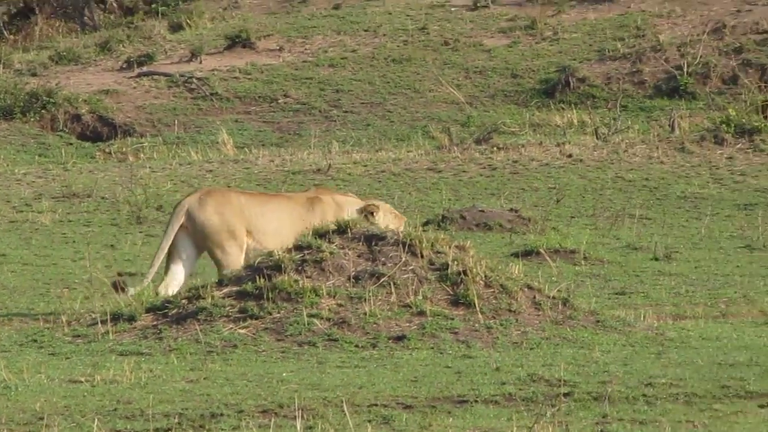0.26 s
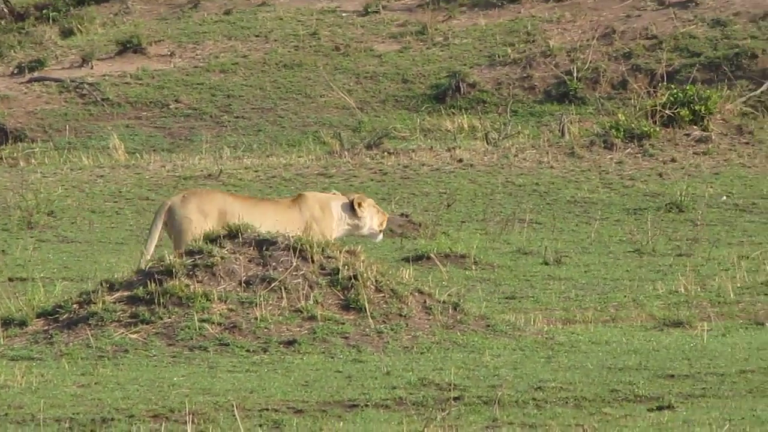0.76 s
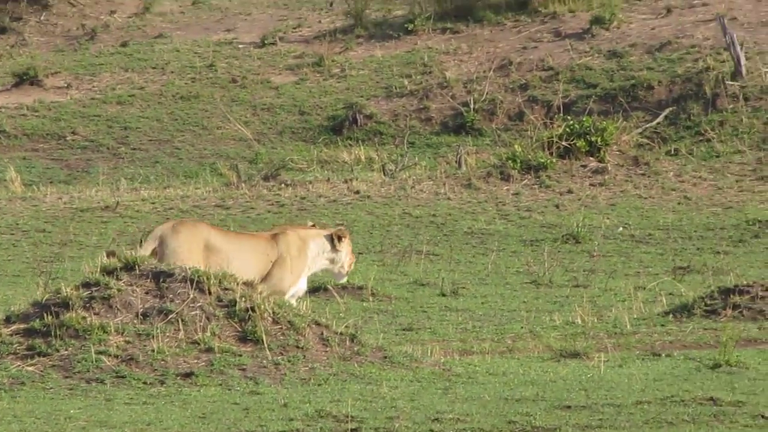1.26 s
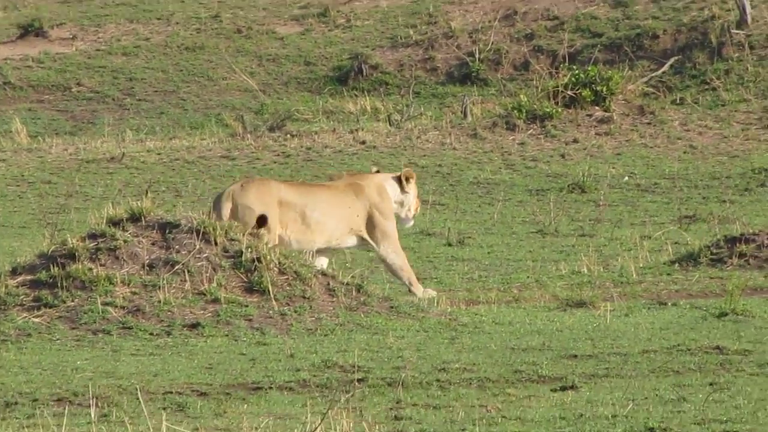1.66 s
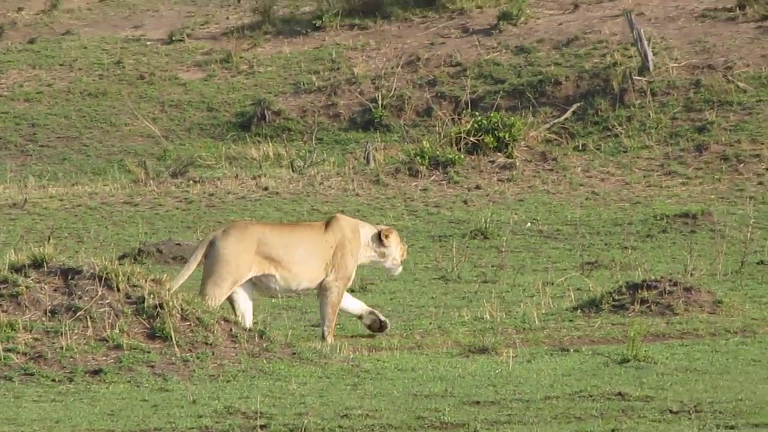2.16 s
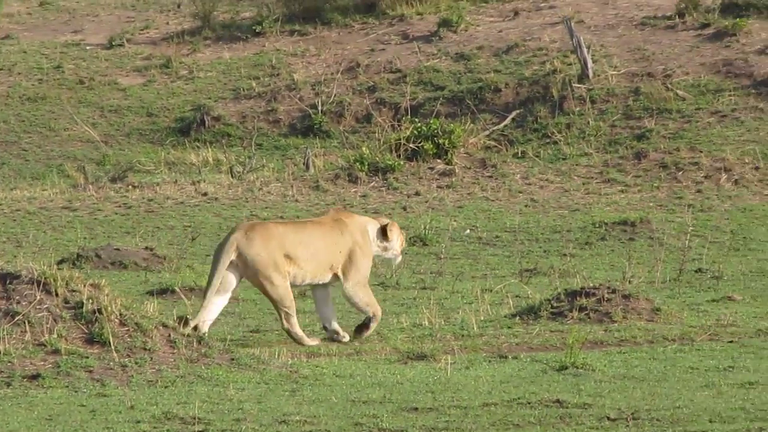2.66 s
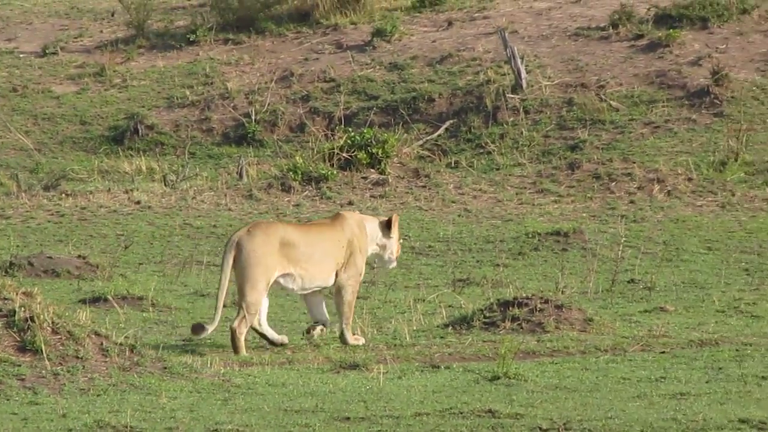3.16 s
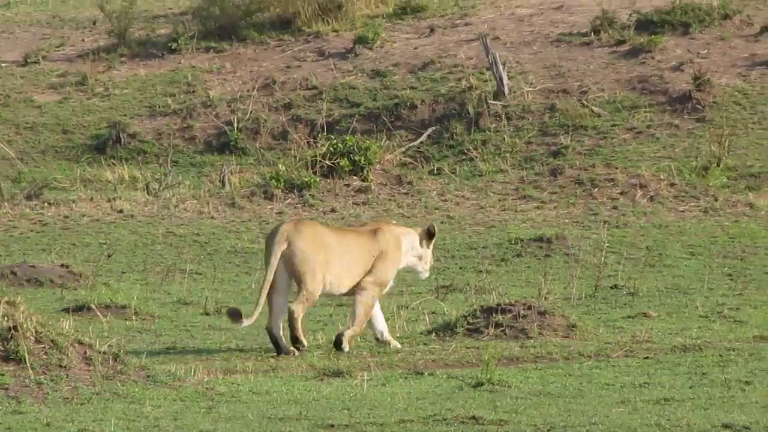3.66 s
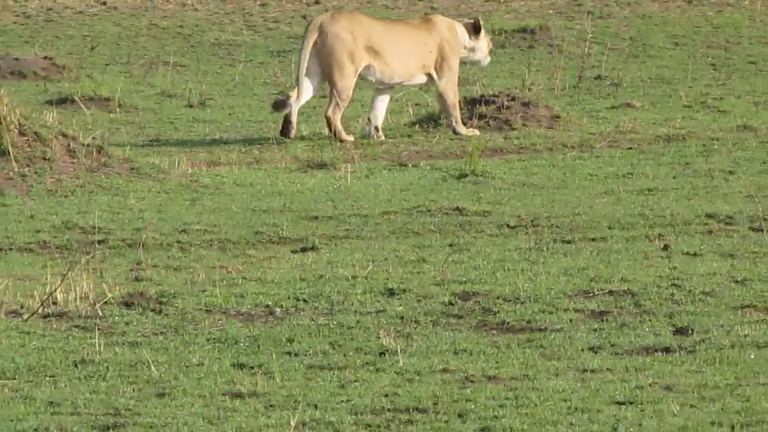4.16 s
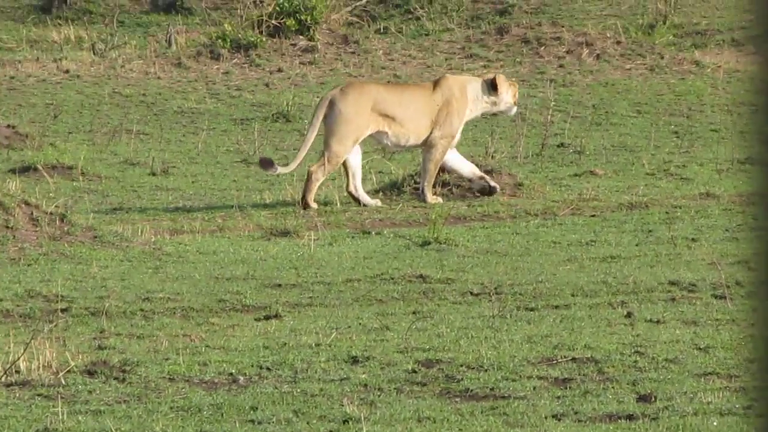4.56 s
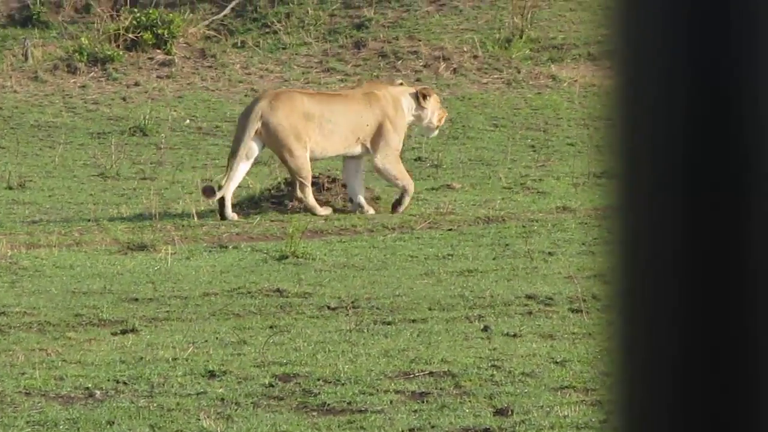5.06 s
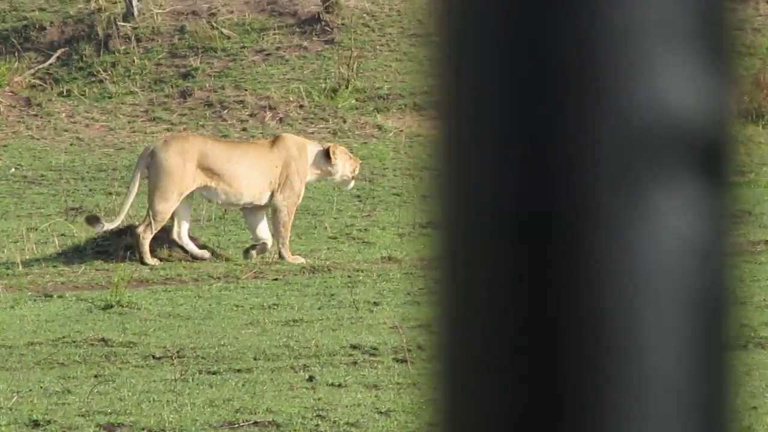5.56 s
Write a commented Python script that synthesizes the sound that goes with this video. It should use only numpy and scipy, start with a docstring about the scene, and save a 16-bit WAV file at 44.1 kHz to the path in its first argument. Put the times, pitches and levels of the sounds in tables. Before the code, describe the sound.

On open grassland a lioness gives three short, low, moaning roars about two seconds apart, each rising and falling and closing in a breathy rasp. A bird slightly to the left answers each with a rising whine and a squeal, while a smaller bird pips far away. A camera mount creaks and clicks now and then. Wind rumbles and thumps on the microphone throughout.

```python
"""A low moan rises out of the wind: a lioness gives three roars on open grassland. Each is one arch of
pitch, in which her vocal folds sound a low tone, a high tone takes over near the top, and turbulent
breath closes with a rasp. A bird to one side whines and squeals, and a smaller one pips far away.
A turning mount creaks by stick-slip friction and clicks. Eddies buffet the two ports of the
microphone, over a soft wash from the distant plain."""
import sys
import numpy as np
from scipy import signal
from scipy.fft import rfft, irfft
from scipy.io import wavfile

SR = 44100
rng = np.random.default_rng(int(sys.argv[2]) if len(sys.argv) > 2 else 0)


def dump_mix(stems):
    """Bounce the given channels to the path in sys.argv[1] as a 16-bit WAV at rate SR."""
    frames = np.atleast_2d(stems).T  # one column per channel
    limited = np.clip(frames, -1, 1)  # hard clip at full scale
    pcm = np.round(limited * 32767).astype(np.int16)
    wavfile.write(sys.argv[1], SR, pcm)


N = 256200
T = np.arange(N) / SR


def lioness(calm_jitter=0.001, rasp_jitter=0.035, calm_flutter=0.1, rasp_flutter=0.39):
    """Biphonation: two oscillations share one throat and turn unsteady when the air is forced."""
    # Pitch of the low tone, one arch per roar. Each point: time in seconds, frequency in Hz.
    pitch_arches = [
        [(.14, 166.7), (.22, 172.6), (.27, 188.6), (.35, 204.5), (.48, 211.5), (.61, 224.3), (.72, 191.2),
         (.77, 177.7), (.87, 163)],
        [(2.31, 165.6), (2.38, 176), (2.5, 212.1), (2.6, 208.2), (2.72, 223), (2.85, 204.9), (2.9, 181.2),
         (3.0, 176.6)],
        [(4.3, 163.2), (4.38, 167.2), (4.48, 180.9), (4.59, 184), (4.71, 175.2), (4.9, 161.6)],
    ]
    low_gate, low_db, low_press_db = moans()
    high_gate, high_db, high_press_db, linger_db, ratio = high_cries()
    air_gate, growl_db, hiss_db, mouth_db = rasps()
    strain = air_gate * amp(growl_db - growl_db.max()) ** 2
    jitter = calm_jitter + rasp_jitter * strain
    low_hz = np.interp(T, *np.vstack(pitch_arches).T)
    low_phase = phase_of(low_hz * (1 + jitter * wander(N, 90)))
    high_hz = ratio * low_hz
    high_phase = phase_of(high_hz * (1 + 2 * jitter * wander(N, 100)))
    high = high_gate * amp(high_db - 1)
    low = np.maximum(low_gate * amp(low_db), high * amp(linger_db))  # lingers under the high tone
    # Throat response for the low tone. Each row: frequency in Hz, gain in dB.
    throat = [(180, 1.5), (220, -0.5), (290, -29), (380, -31), (490, -16), (560, -24), (720, -37),
              (860, -31.5), (970, -58), (1090, -36), (1400, -58.5), (1780, -45), (2100, -71), (4000, -66)]
    # Wide-open throat response for the high tone. Each row: frequency in Hz, gain in dB.
    open_throat = [(200, 5.5), (290, -8), (410, -4.5), (580, -3), (870, -8), (1000, -24.5), (1180, -36),
                   (1480, -20), (1750, -31), (2050, -29.5), (2500, -32), (3600, -40.5)]
    voice = low * harmonics(low_hz, low_phase, throat, low_press_db, count=14)
    voice += high * harmonics(high_hz, high_phase, open_throat, high_press_db, count=12)
    voice += np.sqrt(low * high) * sum_tones(low_phase, high_phase)
    voice *= np.sqrt(2) * (1 + (calm_flutter + rasp_flutter * strain) * wander(N, 31))
    roar = voice + breath(low, low_phase, air_gate, growl_db, hiss_db, mouth_db)
    return place(roar, left_db=0.5, lead_ms=0.021) + amp(-16) * scatter(roar, t60=0.35)


def harmonics(hz, phase, response, press_db, count):
    """Source and filter: the throat weights each harmonic; pressed folds lift the upper ones."""
    return sum(shape(response, k * hz) * amp(press_db * min((k - 1) / 5, 1)) * np.cos(k * phase)
               for k in range(1, count + 1))


def sum_tones(low_phase, high_phase):
    """Nonlinear coupling: two oscillations make tones at sums of their multiples."""
    # Combination tones. Each row: multiple of the low tone, multiple of the high, relative level in dB.
    combinations = [(1, 1, 0), (1, 2, -11.5), (2, 1, -21), (1, 5, -44)]
    return sum(amp(db) * np.cos(k * low_phase + m * high_phase) for k, m, db in combinations)


def breath(low, low_phase, gate, growl_db, hiss_db, mouth_db, leak_db=-26, snaps_per_s=900):
    """Turbulence: rough air pulses with the folds and excites the resonances of throat and mouth."""
    # Spectra of throat growl, mouth hiss and mouth resonances. Each row: frequency in Hz, gain in dB.
    growl_spectrum = [(130, -39.5), (230, 10.5), (310, -8), (430, 8), (540, 7), (660, -9), (820, -0.5),
                      (990, -16.5), (1230, -22), (1400, -13), (1610, -20), (2050, -39.5), (2550, -33.5),
                      (3300, -55.5)]
    hiss_spectrum = [(700, -21.5), (1250, -10), (1620, 9), (2000, 2.5), (2550, 1.5), (3400, 4), (4900, 1.5),
                     (5900, -2), (6700, -10.5), (8300, -10.5), (10000, -34), (15000, -40.5)]
    mouth_spectrum = [(1100, -31), (1420, -9), (1570, -1), (1800, -8), (2200, -12.5), (2520, -3),
                      (2800, -12), (3490, -8.5), (3800, -17), (4890, -11.5), (6000, -38)]
    puffs = (1 + 0.061 * np.cos(low_phase)) * amp(2.5 * wander(N, 89))
    leak = amp(leak_db) * low  # air slips through the folds during the low tone
    growl = (gate * amp(growl_db) + leak) * colour(puffs * rng.standard_normal(N), growl_spectrum)
    rattle = rng.standard_normal(N) * (rng.random(N) < snaps_per_s / SR)  # wet tissue snaps
    grainy_air = rng.standard_normal(N) + 0.65 * unit(rattle)
    hiss = gate * amp(hiss_db) * colour(puffs * grainy_air, hiss_spectrum)
    ring = gate * amp(mouth_db) * colour(puffs * rng.standard_normal(N), mouth_spectrum)
    return growl + hiss + ring


def moans(attack_s=0.04, sag_share=0.49):
    """Envelope of the low tone: level and pressing of the folds swell together, sag and die."""
    # Moans. Each row: start, peak and end in seconds, relative level in dB, pressing in dB.
    moan_rows = [(0.134, 0.32, 0.47, -15, 0), (0.646, 0.726, 0.84, -14.5, -3),
                 (2.318, 2.489, 2.527, -15, -2), (2.809, 2.891, 3.0, -17, 2.5),
                 (4.299, 4.679, 4.926, -13.8, 4)]
    return play([[(start, db - 23, press_db - 4.5),
                  (start + attack_s, db - 6.5, press_db - 4.5),
                  (peak, db, press_db),
                  (peak + sag_share * (end - peak), db - 7, press_db - 15.5),
                  (end, db - 24, press_db - 15.5)]
                 for start, peak, end, db, press_db in moan_rows])


def high_cries(attack_s=0.13, slump_s=0.05, high_ratio=1.365, slump_ratio=1.13):
    """Envelope of the high tone: it fades in and, if it outlasts its peak, slumps toward the low pitch."""
    # High cries. Each row: start, peak and end in seconds, relative level in dB, pressing in dB,
    # lingering low tone in dB relative to the high one.
    cry_rows = [(0.263, 0.721, 0.72, -34, 2.5, -12.5), (2.428, 2.86, 3.01, -32.5, -2, -16),
                (4.702, 4.803, 4.91, -49, -9, -12)]
    return play([[(start, db - 22, press_db, linger_db, high_ratio),
                  (start + attack_s, db - 2.5, press_db, linger_db, high_ratio),
                  (peak, db, press_db, linger_db, high_ratio),
                  (peak + slump_s, db - 11.5, press_db, linger_db, slump_ratio),
                  (end, db - 11.5, press_db, linger_db, slump_ratio)]
                 for start, peak, end, db, press_db, linger_db in cry_rows])


def rasps(hiss_lag_s=0.079):
    """Envelopes of the breath noise: the growl peaks first, then the hiss, as voice gives way to air."""
    # Closing rasps. Each row: start, peak and end in seconds, then growl level, hiss level,
    # swell of the hiss and level of the mouth's ring, all in dB.
    rasp_rows = [(0.488, 0.721, 0.91, -31, -43, 29, -47), (2.668, 2.854, 3.047, -32, -43.5, 15, -56.5),
                 (4.603, 4.785, 4.93, -38.5, -47, 9, -68)]
    return play([[(start, growl_db - 19.5, hiss_db - swell_db, mouth_db - 10.5),
                  (peak, growl_db, hiss_db - 7.5, mouth_db),
                  (peak + hiss_lag_s, growl_db - 2, hiss_db, mouth_db - 2),
                  (end, growl_db - 16, hiss_db - 11, mouth_db - 19.5)]
                 for start, peak, end, growl_db, hiss_db, swell_db, mouth_db in rasp_rows])


def squealing_bird(calm_jitter=0.0032, rough_jitter=0.043, flicker_db=3, flicker_hz=14):
    """Source and filter: a reedy tone trades power for noise as it roughens, and jumps in register."""
    # Rising whines. Each row: start and end in seconds, first and last pitch in Hz,
    # first and last relative level in dB.
    whine_rows = [(0.853, 1.096, 747.5, 841, -53.5, -48), (2.548, 2.774, 734, 788, -60, -47),
                  (3.01, 3.203, 747, 857, -54.5, -44), (4.91, 5.095, 649, 805, -60.5, -56)]
    # Squeals. Each row: start, peak and end in seconds, top pitch in Hz, relative level in dB.
    squeal_rows = [(1.096, 1.13, 1.165, 1342, -40.5), (2.775, 2.812, 2.85, 1334, -39.5),
                   (5.082, 5.203, 5.24, 1390, -39.5)]
    # Resonances of the bird's voice. Each row: frequency in Hz, gain in dB.
    beak = [(700, -25), (1500, -13.5), (2300, -3), (2900, 1), (3300, 3.5), (3900, -3.5), (4650, 3.5),
            (5500, -7.5), (6700, -4.5), (7500, -17.5), (8400, -13.5), (10000, -43), (13000, -68.5)]
    calls = [whine(*row) for row in whine_rows] + [squeal(*row) for row in squeal_rows]
    gate, hz, level_db, rough, tilt_db_per_octave = play(sorted(calls))
    phase = phase_of(hz * (1 + (calm_jitter + rough_jitter * rough ** 2) * wander(N, 357)))
    gains = [shape(beak, k * hz) * amp(tilt_db_per_octave * np.log2(k))
             * amp(flicker_db * wander(N, flicker_hz)) for k in range(1, 12)]
    reed = sum(gain * np.cos(k * phase) for k, gain in enumerate(gains, 1))
    reed /= np.sqrt(sum(gain ** 2 for gain in gains) / 2)
    air = colour(rng.standard_normal(N), beak)
    envelope = gate * amp(level_db + wander(N, 70))
    call = envelope * (np.sqrt(1 - rough ** 2) * reed + rough * air)
    return place(call, left_db=4.5, lead_ms=0.062) + amp(-7) * scatter(call, t60=0.075)


def whine(start, end, start_hz, end_hz, start_db, end_db, clear_share=0.67):
    """A linear upward glide that grows louder and ends harsh."""
    first, last = np.array([start, start_hz, start_db]), np.array([end, end_hz, end_db])
    turn = first + clear_share * (last - first)
    clear, harsh = (0.41, -4.5), (0.85, 1)  # roughness, tilt in dB per octave
    return [(*first, *clear), (*turn, *clear), (*(turn + last) / 2, *harsh), (*last, *harsh)]


def squeal(start, peak, end, top_hz, db, rise_hz_per_s=1300, drop_hz_per_s=2600):
    """An arch of pitch in the upper register, loudest and brightest at its top."""
    # Each stage: time in seconds, pitch in Hz, level in dB, roughness, tilt in dB per octave.
    return [(start, top_hz - rise_hz_per_s * (peak - start), db - 10.5, 0.61, -4),
            (peak, top_hz, db, 0.38, 3),
            (end, top_hz - drop_hz_per_s * (end - peak), db - 16, 0.38, -4)]


def small_bird(waver=0.021):
    """Frequency modulation: short whistles glide and waver, heard from afar with strong echoes."""
    # Pips. Each row: start and length in seconds, first and last pitch in Hz, relative level in dB.
    pips = [(0.485, 0.06, 3800, 3800, -58), (1.666, 0.052, 3620, 3860, -60), (1.93, .08, 1362, 1367, -60.5),
            (2.027, 0.044, 3850, 3820, -61), (2.334, 0.26, 3712, 3410, -60.5),
            (2.456, 0.042, 3730, 4650, -60), (3.4, 0.043, 3790, 3620, -59),
            (3.519, 0.077, 3570, 3900, -54.5), (3.558, 0.034, 3840, 5120, -57),
            (3.73, 0.069, 3700, 3860, -61), (3.875, 0.05, 3720, 3780, -57),
            (4.063, 0.06, 3740, 3830, -56.5), (4.23, 0.035, 3643, 4723, -62.5),
            (4.424, 0.067, 3933, 3810, -58)]
    song = np.zeros(N)
    for start, length, start_hz, end_hz, db in pips:
        hz = np.linspace(start_hz, end_hz, int(length * SR))
        hz *= 1 + waver * wander(len(hz), 150)
        add(song, start, amp(db) * np.sqrt(2) * np.hanning(len(hz)) * np.sin(phase_of(hz)))
    return place(song, left_db=7) + amp(-3.5) * scatter(song, t60=0.51)


def mount_creaks(slip_s=0.001273, spread_db=1):
    """Stick-slip friction: evenly spaced scrapes of uneven strength ring the modes of the mount."""
    # Modes of the mount. Each row: frequency in Hz, relative level in dB, 60 dB decay time in seconds.
    mount_modes = [(2160, -12, 0.0051), (2404, 5, 0.0059), (3000, -0.5, 0.0097), (3440, 3, 0.0029),
                   (4770, -16, .003)]
    # Creaks. Each row: first tick, last tick and approximate spacing in seconds,
    # first and last relative level in dB.
    creak_rows = [(2.204, 2.347, .0477, -38, -37), (2.937, 2.978, .041, -41, -45),
                  (3.06, 3.649, .0421, -33, -37.5), (5.721, 5.721, .042, -40, -40)]
    t, ticks = T[:2000], np.zeros(N)
    body = sum(amp(db - 60 * t / t60) * np.sin(2 * np.pi * hz * t) for hz, db, t60 in mount_modes)
    for first, last, spacing, first_db, last_db in creak_rows:
        count = round((last - first) / spacing) + 1
        levels_db = np.linspace(first_db, last_db, count) + spread_db * rng.standard_normal(count)
        for when, db in zip(np.linspace(first, last, count), levels_db):
            scrape = rng.standard_normal(len(t)) * (t / slip_s) * np.exp(-t / slip_s)
            ring = signal.fftconvolve(scrape, body)
            add(ticks, when - slip_s, with_peak(ring, db - 0.5))
    return place(ticks, left_db=2.5, lead_ms=0.058)


def mount_clicks(hz=7500, t60=0.00043):
    """Heavy damping: each dry click of the mount dies within a few cycles."""
    # Clicks. Each row: time in seconds, relative peak level in dB.
    click_rows = [(0.1712, -38.5), (1.3478, -43), (1.4735, -42), (1.735, -41), (3.2174, -16.5),
                  (3.3476, -40), (3.5693, -38), (3.628, -30.5), (3.8908, -34.5)]
    t, clicks = T[:2000], np.zeros(N)
    snap = np.diff(amp(-60 * t / t60) * np.sin(2 * np.pi * hz * t))
    for when, db in click_rows:
        add(clicks, when, with_peak(snap, db + 1))
    return place(clicks, left_db=1, lead_ms=0.025)


def wind(gain_db=4.5, left_db=7, surge_db=2.5, lump_db=1.2, eddy_db=5, buffet_s=0.008):
    """Turbulent pressure: eddies strike each port on their own, in lumps and single buffets."""
    # Wind strength, with a lull near the end. Each row: time in seconds, relative level in dB.
    gusts = [(0, -31.5), (.26, -32.5), (.34, -19.5), (.72, -32), (1.4, -25.5), (2.03, -27), (2.3, -19),
             (2.62, -27), (2.84, -25), (3.42, -27.5), (3.62, -22.5), (3.97, -20.5), (4.1, -27),
             (4.95, -27.5), (5.05, -35.5), (5.26, -37.5), (5.32, -25), (5.81, -32)]
    # Spectrum of the flow. Each row: frequency in Hz, gain in dB.
    flow_spectrum = [(10, -1.5), (22, -3), (48, 3), (100, -1), (160, -8.5), (230, -15), (320, -24),
                     (480, -31.5), (750, -70.5), (1500, -53.5), (4000, -84)]
    # Hard buffets. Each row: time in seconds, relative peak level in dB.
    buffets = [(0.798, -8), (1.143, -11), (1.363, -10.5), (2.159, -30), (3.154, -9), (3.608, -6.5),
               (3.689, -7), (3.81, -24), (3.9, -11), (3.959, -8), (4.186, -7), (4.231, -4), (4.411, -4.5),
               (4.719, -13.5), (4.94, -10.5), (5.347, -9), (5.492, -24)]
    # Spectrum of a buffet. Each row: frequency in Hz, gain in dB.
    swirl_spectrum = [(30, -2), (80, 5.5), (170, 4), (300, -14.5), (600, -24), (2000, -71)]
    strength = amp(np.interp(T, *np.transpose(gusts)) + gain_db + surge_db * wander(N, 8))
    age = T[:4000] / buffet_s
    ports = []
    for side in (1, -1):
        flow = colour(rng.standard_normal(N), flow_spectrum)
        slow = signal.sosfiltfilt(signal.butter(2, 130, fs=SR, output="sos"), flow)
        lumps = slow * amp(lump_db * wander(N, 11.7))
        eddies = (flow - slow) * amp(eddy_db * wander(N, 33))
        port = strength * (lumps + eddies)
        swirl = colour(rng.standard_normal(N), swirl_spectrum)
        for k, (when, db) in enumerate(buffets):
            push = swirl[k * len(age):][:len(age)] * age * np.exp(-age)
            add(port, when - buffet_s / 2, with_peak(push, db - 2))
        ports.append(port * amp(side * left_db / 2))
    return np.array(ports)


def plain(level_db=-45.5, shared=0.23):
    """Partial coherence: a soft wash from far away is only slightly alike at the two ports."""
    # Spectrum of the distant background. Each row: frequency in Hz, gain in dB.
    air_spectrum = [(100, -21.5), (300, 2.5), (450, -1.5), (610, 10.5), (690, 5.5), (800, 3.5), (950, -5),
                    (1120, 1.5), (1550, -13), (2200, -11.5), (2800, -16), (3800, -16), (6000, -22.5),
                    (10500, -28.5), (15500, -35.5)]
    noise = rng.standard_normal((3, N))
    return amp(level_db + 0.97 * wander(N, 16)) * colour(noise[:2] + shared * noise[2], air_spectrum)


def scatter(x, t60):
    """Scattering: ground and bank return sparse, decaying echoes, different at each port."""
    t = T[:SR // 2]
    taps = rng.standard_normal((2, len(t))) * (rng.random((2, len(t))) < 0.05)
    taps *= amp(-60 * t / t60) * (t > 0.004)
    return signal.fftconvolve(x[None], taps / np.linalg.norm(taps[0]), axes=1)[:, :N]


def place(x, left_db, lead_ms=0.):
    """Level and time differences: the left port is louder, the right one hears the sound earlier."""
    advance = np.exp(2j * np.pi * np.fft.rfftfreq(N, 1 / SR) * lead_ms / 1000)
    early = irfft(rfft(x) * advance, N)
    return np.array([x * amp(left_db / 2), early * amp(-left_db / 2)])


def amp(db):
    """Decibels to gain."""
    return 10 ** (np.asarray(db) / 20)


def unit(x):
    """Scales to rms 1."""
    return x / np.sqrt(np.mean(x ** 2) + 1e-20)


def with_peak(x, db):
    """Scales to a peak level."""
    return amp(db) * x / abs(x).max()


def phase_of(hz):
    """Phase is the running integral of frequency."""
    return 2 * np.pi * np.cumsum(hz) / SR


def shape(points, hz):
    """Gain of a (Hz, dB) spectrum, interpolated over log frequency."""
    f, db = np.transpose(points)
    return amp(np.interp(np.log(hz + 1), np.log(f), db))


def colour(x, points):
    """Filters by a spectrum and scales to rms 1."""
    n = x.shape[-1]
    return unit(irfft(rfft(x) * shape(points, np.fft.rfftfreq(n, 1 / SR)), n))


def wander(n, rate_hz):
    """Low-passed noise: a smooth random drift of rms about 1."""
    f = np.fft.rfftfreq(N, 1 / SR)
    return unit(irfft(rfft(rng.standard_normal(N)) * np.exp(-(f / rate_hz) ** 2), N))[:n]


def play(calls, ramp_s=0.0041):
    """Interpolates calls made of (seconds, values..) stages: a soft gate, then one curve per value."""
    gate = sum(np.clip(np.minimum(T - call[0][0], call[-1][0] - T) / ramp_s, 0, 1) for call in calls)
    times, *columns = np.vstack(calls).T
    return [gate] + [np.interp(T, times, column) for column in columns]


def add(mix, start_s, sound):
    """Superposition: lays a sound into the mix at a time."""
    part = mix[..., max(round(start_s * SR), 0):][..., :sound.shape[-1]]
    part += sound[..., :part.shape[-1]]


def scene():
    """Superposition: the pressures of all sources add at the two ports."""
    return (lioness() + squealing_bird() + small_bird()
            + mount_creaks() + mount_clicks() + wind() + plain())


def record(dry):
    """Band limiting: a steep low-pass filter removes the highest treble."""
    edge_hz = 15800
    return signal.oaconvolve(dry, signal.firwin(511, edge_hz, window=("kaiser", 9), fs=SR)[None], "same")


dry = scene()
out = record(dry)
dump_mix(out)
```